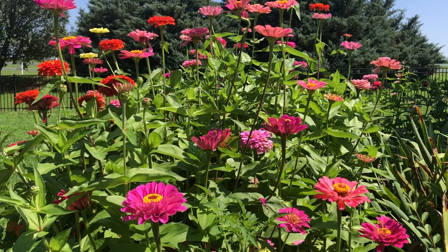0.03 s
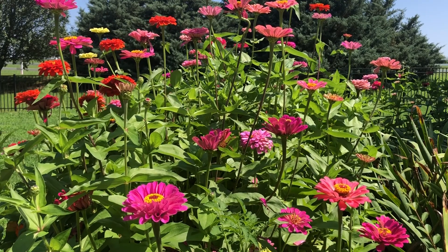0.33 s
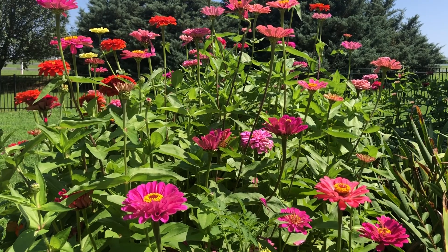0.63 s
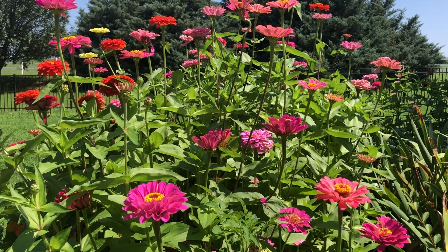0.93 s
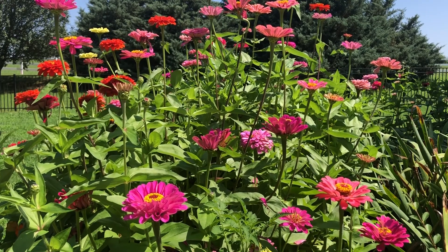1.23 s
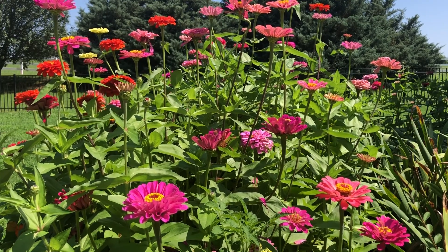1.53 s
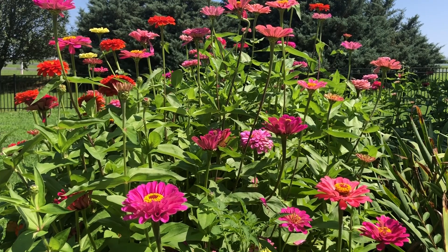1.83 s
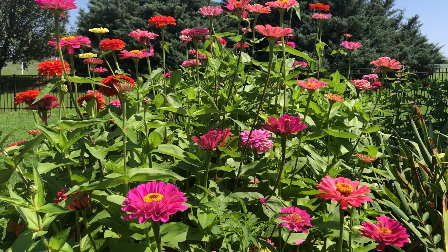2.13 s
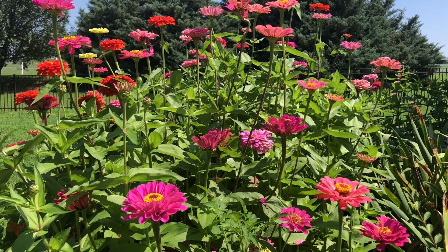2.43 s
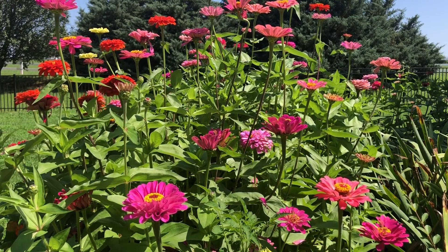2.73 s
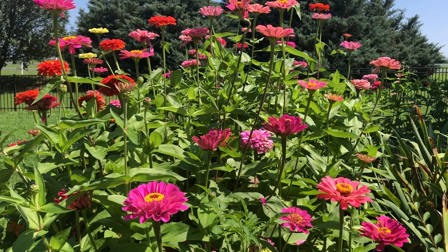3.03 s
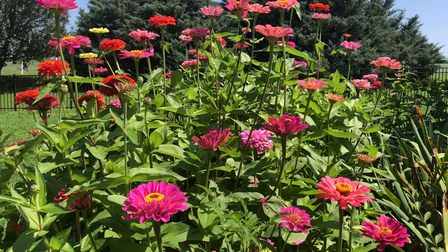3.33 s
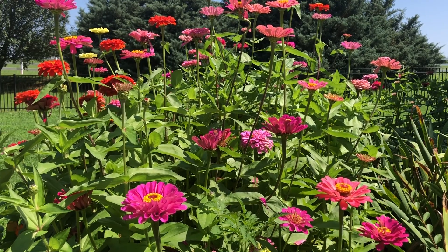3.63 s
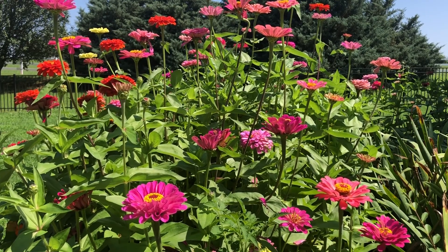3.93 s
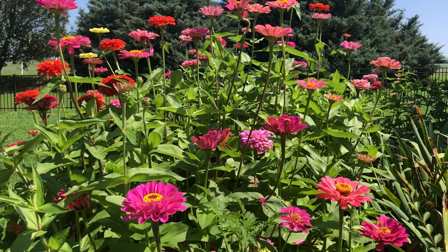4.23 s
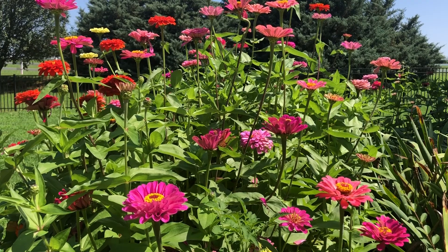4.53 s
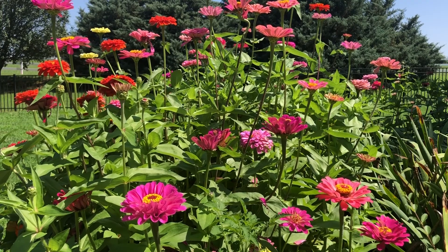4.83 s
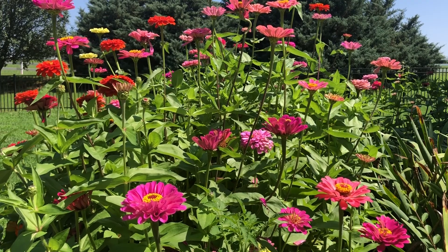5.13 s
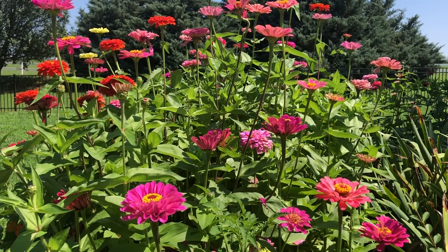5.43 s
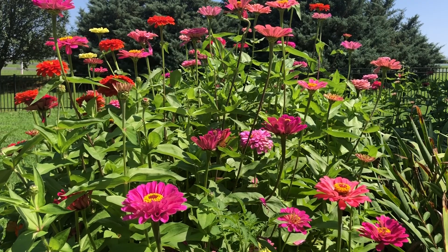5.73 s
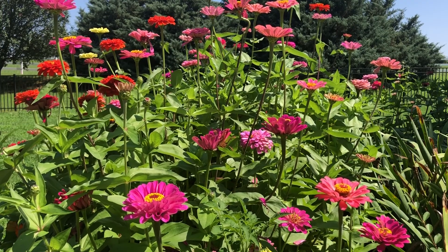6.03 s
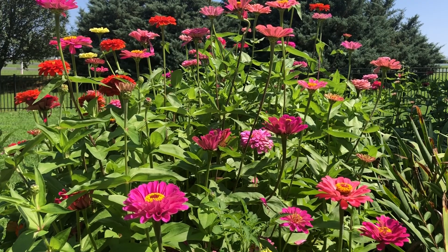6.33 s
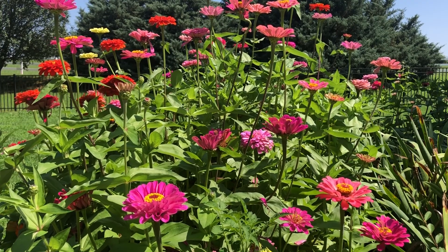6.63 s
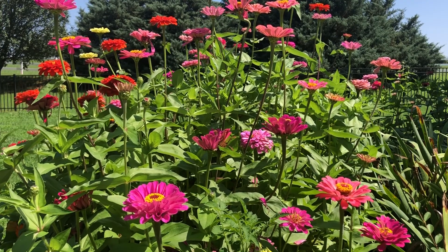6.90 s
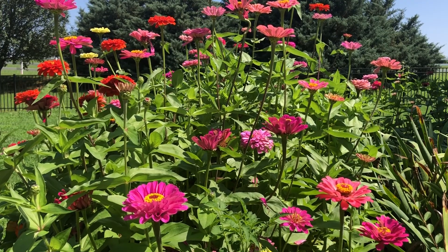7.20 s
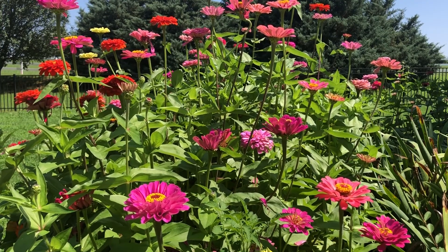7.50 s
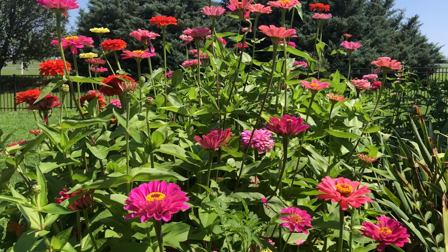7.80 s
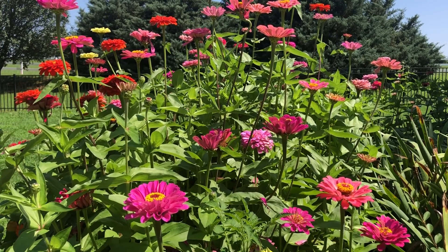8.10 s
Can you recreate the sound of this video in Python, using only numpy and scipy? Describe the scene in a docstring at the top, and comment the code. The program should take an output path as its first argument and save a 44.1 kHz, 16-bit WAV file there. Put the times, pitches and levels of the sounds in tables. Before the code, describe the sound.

A summer garden is heard from one fixed spot. Throughout, a distant mower hums low and wavering under soft open-air hiss, while a cricket holds a quiet, high drone and tiny katydids lisp very faintly above it. A bird gives sharp, high two-note chirps with a slight squeak at about 0.2, 2.2, 2.8, 3.8, 4.5, 6.2, 7.0, 7.6 and 8.1 seconds. At 1.4 seconds a second bird begins a dry, high trill of about nineteen pulses a second. This is the most prominent sound; it swells until 3.8 seconds, then eases and stops near 4.3. Both birds carry a short, light echo from the trees. Far birds add faint, short whistles from about 1 to 7 seconds. Stems tick faintly near 0.3, 1, 6 and 7.4 seconds. The insects, hum and hiss continue to the end, just past 8 seconds.

```python
"""A bird's dry trill, a train of frequency-modulated tones, swells and eases in a summer flower garden.
A second bird gives sharp two-note chirps and others whistle far off; trees and fence scatter the sound.
By stridulation a ground cricket drones near 6 kHz and tiny katydids lisp and buzz above it.
Stems tick, and the harmonics of a distant mower hum under the broadband hiss of the open air."""
import sys
import numpy as np
from scipy import signal
from scipy.fft import rfft, irfft
from scipy.io import wavfile
from scipy.ndimage import uniform_filter1d

SR = 44100
rng = np.random.default_rng(int(sys.argv[2]) if len(sys.argv) > 2 else 0)


def output_pcm(signal):
    """Save a mono or channel-first signal as 16-bit PCM at the path in sys.argv[1].

    Samples are clipped to [-1, 1] before scaling.
    """
    pcm = np.clip(np.atleast_2d(signal).T, -1, 1) * 32767
    wavfile.write(sys.argv[1], SR, np.round(pcm).astype(np.int16))


N = 359856
TIME = np.arange(N) / SR


def undb(db):
    """Amplitude ratio of a level in decibels."""
    return 10 ** (np.asarray(db) / 20)


def unit(x):
    """Normalisation to an rms of 1."""
    return x / np.sqrt(np.mean(x ** 2))


def add(out, start, x):
    """Superposition: x is summed into out from a start time in seconds."""
    i = int(round(start * SR))
    a, b = max(i, 0), min(i + len(x), N)
    if b > a:
        out[a:b] += x[a - i:b - i]


def wander(rate_hz):
    """Low-pass random fluctuation with a standard deviation near 1."""
    hold = int(SR / rate_hz)
    steps = np.repeat(rng.standard_normal(N // hold + 1), hold)
    return 1.3 * uniform_filter1d(uniform_filter1d(steps, hold), hold)[:N]


def resonate(x, hz, width_hz):
    """Two equal resonators in cascade pass a band with steep skirts."""
    b, a = signal.iirpeak(min(hz, SR * .45), hz / width_hz, fs=SR)
    return signal.lfilter(b, a, signal.lfilter(b, a, x))


def band(hz, width_hz, samples=N):
    """Resonance driven by white noise, at an rms of 1."""
    return unit(resonate(rng.standard_normal(samples), hz, width_hz))


def phase_of(hz):
    """Phase in radians is the time integral of frequency."""
    return 2 * np.pi * np.cumsum(hz) / SR


def reverberate(x, wet_db, t60, onset_s=.0024):
    """Scattering by leaves, fence and trees adds a diffuse tail that falls 60 dB in t60 seconds."""
    t = np.arange(SR) / SR
    tail = rng.standard_normal(SR) * undb(-60 * t / t60) * (1 - np.exp(-(t / onset_s) ** 2))
    return x + undb(wet_db) * signal.fftconvolve(x, tail / np.linalg.norm(tail))[:N]


# Spectrum of the open air: (frequency [Hz], relative spectral density [dB])
AIR_SPECTRUM = [(22, -29), (36, -9), (70, 2.5), (130, 0.5), (230, -2.5), (330, -11.5), (500, -19.5),
                (1000, -25), (1400, -28), (1750, -27), (2100, -30), (5000, -33.5), (8000, -38),
                (12000, -36.5), (15500, -44)]

def open_air():
    """Incoherent sources, far traffic and leaves, sum to coloured noise that swells slightly."""
    hz, db = np.transpose(AIR_SPECTRUM)
    colour = undb(np.interp(np.log(np.fft.rfftfreq(N, 1 / SR) + 1), np.log(hz), db))
    hiss = unit(irfft(rfft(rng.standard_normal(N)) * colour, N))
    return hiss * undb(-56 + .5 * wander(1.296))


# Exhaust spectrum: (harmonic number, relative level [dB])
EXHAUST_HARMONICS = [(3, -8.5), (4, -19.5), (5, 0), (6, -5), (7, -15), (8, -13.5), (9, -39), (10, -18),
                     (11, -24), (12, -24)]
# Envelopes of exhaust, blade hum, its octave and low rumble: (time [s], relative level [dB])
EXHAUST_ENVELOPE = [(0.0, -53), (0.39, -56), (1.11, -51.5), (1.23, -59), (3.38, -50.5), (3.82, -58),
                    (4.7, -55), (5.27, -56.5), (7.07, -53), (7.3, -56), (8.05, -57), (8.16, -66)]
BLADE_ENVELOPE = [(0.0, -58), (1.0, -57.5), (2.13, -52), (2.54, -63), (2.68, -52.5), (2.82, -67),
                  (3.86, -45), (4.95, -52), (5.07, -59), (6.59, -67.5), (6.73, -55), (6.82, -69.5),
                  (7.54, -55), (7.82, -62), (7.98, -50), (8.16, -49.5)]
OCTAVE_ENVELOPE = [(0.0, -56), (1.02, -61), (1.59, -56), (2.07, -60), (4.16, -55.5), (4.43, -63),
                   (4.5, -55.5), (6.84, -61), (7.16, -55.5), (8.16, -53.5)]
RUMBLE_ENVELOPE = [(0.0, -50), (3.18, -64), (3.41, -56.5), (6.11, -65), (7.93, -51.5), (8.16, -61.5)]

def mower():
    """Line spectrum: exhaust and belt-driven blades share one speed; the air makes each line fade."""
    firing_hz = 28.92 + .065 * TIME
    blade_ratio = 3.79  # blade hum frequency over firing rate
    phase = phase_of(firing_hz * (1 + .00307 * wander(7)))
    envelopes = EXHAUST_ENVELOPE, BLADE_ENVELOPE, OCTAVE_ENVELOPE, RUMBLE_ENVELOPE
    exhaust_db, blade_db, octave_db, rumble_db = (np.interp(TIME, *np.transpose(e)) for e in envelopes)

    def partial(multiple, db, fade_db):
        amplitude = np.sqrt(2) * undb(db + fade_db * wander(5))
        return amplitude * np.sin(multiple * phase + rng.uniform(0, 2 * np.pi))

    exhaust = sum(partial(k, exhaust_db + 1.5 + db, fade_db=.67) for k, db in EXHAUST_HARMONICS)
    blades = partial(blade_ratio, blade_db + .7, fade_db=.76)
    blades += partial(2 * blade_ratio, octave_db - 1, fade_db=.5)
    blades += partial(3 * blade_ratio, -76.5, fade_db=3.5)
    shaft = partial(2, rumble_db - .9, fade_db=-1.2)
    rumble = undb(rumble_db - 10.5) * band(56, 54)
    return exhaust + blades + shaft + rumble


# Dry ticks: (time [s], centre frequency [Hz], bandwidth [Hz], level [dB])
STEM_TICKS = [(0.271, 2930, 1800, -62), (.97, 2400, 1500, -68), (5.935, 8500, 3000, -76),
              (6.033, 9600, 8000, -65.5), (7.39, 8000, 3950, -71)]

def stem_ticks():
    """Damped transients: each crack among the stems is a noise band in exponential decay."""
    out = np.zeros(N)
    t = np.arange(SR // 10) / SR
    t60 = .085
    for start, hz, width_hz, db in STEM_TICKS:
        add(out, start, band(hz, width_hz)[:len(t)] * undb(db - 60 * t / t60))
    return reverberate(out, wet_db=.5, t60=.16)


def buzzing_katydid():
    """Narrow-band noise near 12 kHz: a thin buzz is held, then decays exponentially."""
    hold_s, decay_db_per_s = 2.1, 40
    decay_db = decay_db_per_s * np.maximum(TIME - hold_s, 0)
    return band(11850, 600) * undb(-85.5 - decay_db + wander(40))


# Runs of lisps from two katydids: (start [s], end [s], lisp rate [Hz])
QUICK_LISPS = [(.05, 1.65, 5.29), (1.81, 4.15, 5.36), (4.23, 6.28, 5.1), (6.35, 8.12, 5.4)]
SLOW_LISPS = [(.09, .95, 4.08), (1.14, 3.45, 4.5), (3.53, 4.4, 5.35), (4.62, 8.1, 4.2)]

def lisping_katydid(runs, hz, width_hz, lisp_s, db):
    """Stridulation: each lisp is a quick run of wing scrapes ringing one high resonance."""
    gate = np.zeros(N)
    t = np.arange(-lisp_s, lisp_s, 1 / SR)
    lisp = np.exp(-(2 * t / lisp_s) ** 4)
    for start, end, rate in runs:
        for centre in np.arange(start, end, 1 / rate):
            add(gate, centre - lisp_s + .0057 * rng.standard_normal(), lisp)
    scrape_hz = 126 * (1 + .07 * wander(25))
    scrapes = np.exp(np.cos(phase_of(scrape_hz)))
    wing = np.sin(phase_of(hz + width_hz / 2 * wander(900)))
    return undb(db) * reverberate(gate * unit(scrapes * wing), wet_db=-7.5, t60=.4)


# One wing stroke, opening then closing: (cycle position [0-1], frequency [Hz], force [0-1])
WING_STROKE = [(0, 6366, 0), (.17, 6147, 0.24), (0.331, 5678, 0.01), (0.419, 5667, 0.37),
               (0.532, 5795, 0.55), (.66, 6116, 0.26), (.8, 6110, 0), (1, 6290, 0)]

def cricket():
    """Modulated stridulation: each stroke slides a tone down and up; the strokes falter and catch up."""
    stroke_hz, falter_hz = 82.7, 12.5
    falter = phase_of(falter_hz * (1 + .02 * wander(6.1)))
    stroke_phase = phase_of(stroke_hz * (1 + .003 * wander(11))) + .5 * np.sin(falter)
    position = stroke_phase / (2 * np.pi) % 1
    knots, *columns = np.transpose(WING_STROKE)
    hz, force = (np.interp(position, knots, column) for column in columns)
    force *= (1 + .24 * np.cos(falter)) * undb(.8 * wander(60))
    wing = unit(force * np.sin(phase_of(hz + 50 * wander(400))))
    octave = undb(-81) * force * (band(11900, 200) + band(12250, 130))
    # more crickets further off blend into a steady sheen
    chorus = band(6140, 800) * undb(wander(3.6))
    chorus += undb(-.5) * band(5405, 220) + undb(-15.5) * band(6285, 150)
    return undb(-65.5) * reverberate(wing, wet_db=-5.5, t60=.064) + octave + undb(-77) * chorus


def add_note(out, start, contour, db, pitch=1, octave_db=-30, rasp=.003, breath_db=-60):
    """Frequency modulation: a bird's near-sine glides, with random rasp, a weak octave and breath."""
    times, hz, level_db = np.transpose(contour)
    t = np.arange(times[0], times[-1], 1 / SR)
    jitter = unit(uniform_filter1d(rng.standard_normal(SR // 2), size=40))[:len(t)]
    glide_hz = pitch * uniform_filter1d(np.interp(t, times, hz), size=130)
    phase = phase_of(glide_hz * (1 + rasp * jitter))
    envelope = undb(np.interp(t, times, level_db))
    tone = np.sqrt(2) * np.sin(phase)
    octave = np.sqrt(2) * undb(octave_db) * np.sin(2 * phase)
    breath = undb(breath_db) * band(8900, 20500, samples=SR // 2)[:len(t)]
    # the throat favours the middle of the note; octave and breath fade less towards its ends
    note = envelope * tone + np.sqrt(envelope) * (octave + breath)
    add(out, start + times[0], undb(db) * signal.windows.tukey(len(t), .1) * note)


# Whistles: (time [s], duration [s], start frequency [Hz], end frequency [Hz], relative level [dB])
FAR_WHISTLES = [(0.851, 0.061, 4400, 3700, -77), (0.988, .07, 4340, 3390, -72.5),
                (1.75, 0.068, 4300, 3600, -74), (2.643, 0.078, 3850, 4240, -64),
                (3.126, 0.073, 2970, 3780, -68.5), (3.39, 0.027, 3400, 2810, -72),
                (4.688, 0.09, 2690, 2803, -69.5), (4.919, .06, 2850, 3070, -72),
                (5.293, 0.057, 3000, 3450, -71), (5.508, .09, 2620, 2530, -78),
                (5.867, .22, 2600, 2430, -70.5), (6.338, 0.16, 2482, 2474, -70.5),
                (6.533, 0.065, 2344, 2193, -73), (6.759, 0.065, 2765, 3690, -68),
                (6.908, 0.057, 2500, 3620, -70)]

def far_birds():
    """At a distance the diffuse field outweighs the direct sound: soft slurs trail off in the trees."""
    out = np.zeros(N)
    for start, length, from_hz, to_hz, db in FAR_WHISTLES:
        middle_hz = from_hz + .4 * (to_hz - from_hz)
        contour = [(0, from_hz, -6), (length / 2, middle_hz, 0), (length, to_hz, -3)]
        add_note(out, start, contour, db, rasp=.033)
    blurred = reverberate(out, wet_db=3, t60=.08, onset_s=.001)
    return undb(-8) * reverberate(blurred, wet_db=-3, t60=1)


# Chirps: (time [s], high note's relative level [dB], low note's relative level [dB], pitch ratio)
CHIRP_CALLS = [(0.154, -44, -43.5, 0.98), (2.234, -44, -43, 0.99), (2.773, -45, -43, 0.96),
               (3.752, -47, -46, 0.97), (4.545, -45.5, -44, 0.95), (6.237, -45, -50, 0.98),
               (7.045, -42.5, -44, 1), (7.563, -41.5, -46, 0.99), (8.084, -42.5, -55, 0.97)]
# Contours within a chirp: (time offset [s], frequency [Hz], relative level [dB])
HIGH_NOTE = [(-.030, 3850, -28), (-.021, 4800, -16), (-.0175, 5600, -8), (-.013, 6250, -1),
             (-.005, 6520, 0), (.004, 6400, 0), (.012, 5950, -1.5), (.019, 5300, -5), (.025, 4400, -14),
             (.033, 3500, -29)]
LOW_NOTE = [(.060, 3800, -23), (.068, 4350, -8), (.075, 4900, -1), (.084, 5350, 0), (.090, 5000, -2),
            (.096, 4250, -9), (.103, 3450, -24)]
SQUEAK_CONTOUR = [(-.075, 6860, -37), (-.05, 7440, -19.5), (-.026, 7100, -16.5), (0, 6800, -53),
                  (.035, 6500, -29), (.055, 6750, -5), (.072, 6200, -25)]

def chirping_bird():
    """Biphonation: one side of the syrinx sings a high arch, then a low one, while the other squeaks."""
    out = np.zeros(N)
    for start, high_db, low_db, pitch in CHIRP_CALLS:
        add_note(out, start, HIGH_NOTE, high_db, pitch, octave_db=-18, rasp=.0237, breath_db=-34)
        add_note(out, start, LOW_NOTE, low_db, pitch, octave_db=-22, rasp=.038, breath_db=-33)
        add_note(out, start, SQUEAK_CONTOUR, -47, pitch, octave_db=-38, rasp=.045, breath_db=-19)
    # twigs around the perch blur each note before the garden echoes it
    blurred = reverberate(out, wet_db=-7, t60=.05, onset_s=.001)
    return undb(-5) * reverberate(blurred, wet_db=-2, t60=.52, onset_s=.0063)


# A down-slur that flicks up at its end: (time offset [s], frequency [Hz], relative level [dB])
TRILL_SYLLABLE = [(-.007, 6150, -26), (-.004, 5710, -9), (0, 5220, -3), (.005, 4760, -2), (.010, 4420, -6),
                  (.013, 4510, -7), (.0155, 5050, -7.5), (.0172, 6830, -29), (.020, 8400, -31)]
# Tempo of the trill, flagging at the end: (time [s], syllable rate [Hz])
SYLLABLE_RATE = [(1.43, 19.09), (2.4, 19.41), (3.4, 19.21), (4.3, 18.36)]

def trilling_bird():
    """A pulse train of frequency sweeps, about 19 a second, swells and eases as its pitch settles."""
    start_s, attack_s, syllables = 1.43, .33, 56
    peak_s, peak_db = 3.78, -40.6
    swell_db_per_s, ease_db_per_s = 1.05, 3.5
    out, now = np.zeros(N), start_s
    for _ in range(syllables):
        age, past_peak = now - start_s, now - peak_s
        entry_db = -8.5 * max(1 - age / attack_s, 0)
        swell_db = min(swell_db_per_s * past_peak, -ease_db_per_s * past_peak)
        db = peak_db + entry_db + swell_db + .27 * rng.standard_normal()
        pitch = 1 + .013 * np.exp(-age / .85) + .0067 * rng.standard_normal()
        add_note(out, now, TRILL_SYLLABLE, db, pitch, octave_db=-39, rasp=.0047)
        now += 1 / np.interp(now, *np.transpose(SYLLABLE_RATE))
    return reverberate(out, wet_db=-6.5, t60=.53, onset_s=.0027)


def scene():
    """Linear superposition: the pressures of all sources add at one point."""
    quick = lisping_katydid(QUICK_LISPS, hz=10120, width_hz=190, lisp_s=.043, db=-74)
    slow = lisping_katydid(SLOW_LISPS, hz=9790, width_hz=320, lisp_s=.083, db=-78.5)
    insects = quick + slow + cricket() + buzzing_katydid()
    birds = trilling_bird() + chirping_bird() + far_birds()
    background = stem_ticks() + mower() + open_air()
    return (background + insects + birds)[None]


def record(dry):
    """Band limiting: a steep elliptic low-pass removes the highest treble."""
    cutoff_hz = 15700
    return signal.sosfilt(signal.ellip(10, .2, 70, cutoff_hz, fs=SR, output="sos"), dry)


dry = scene()
out = record(dry)
output_pcm(out)
```